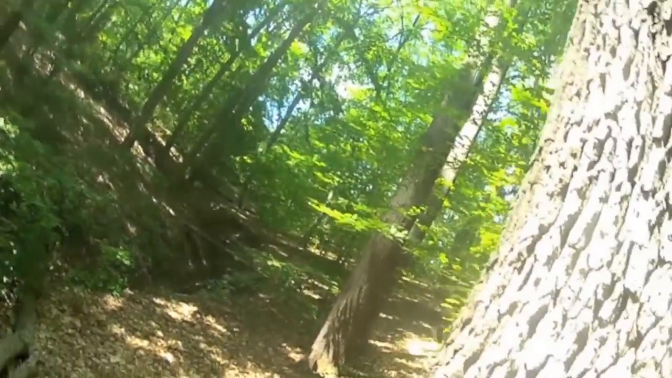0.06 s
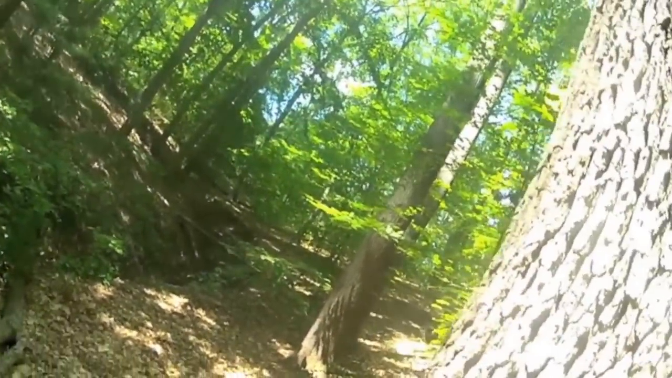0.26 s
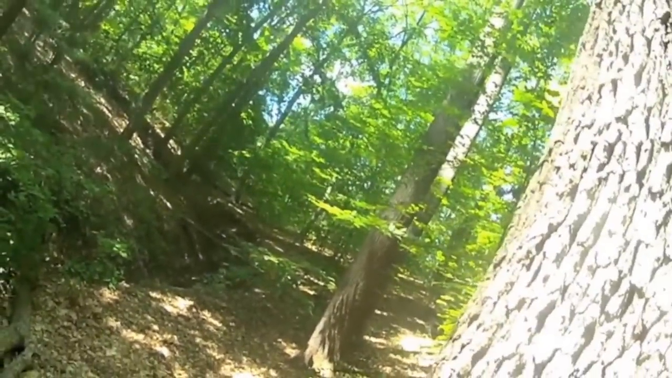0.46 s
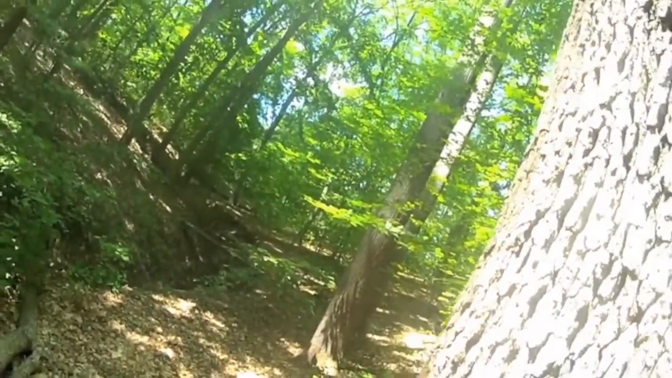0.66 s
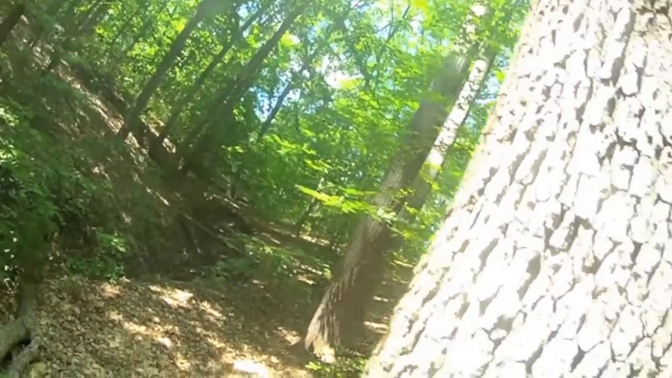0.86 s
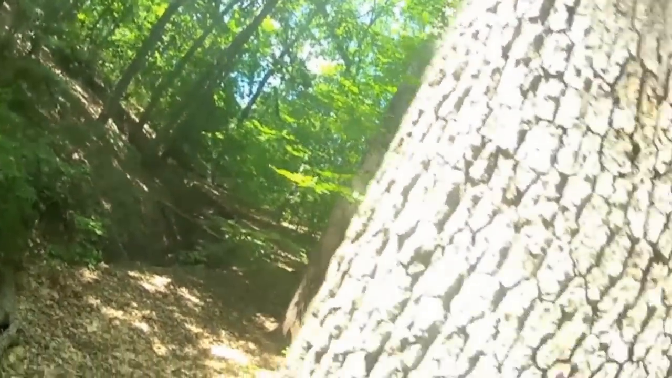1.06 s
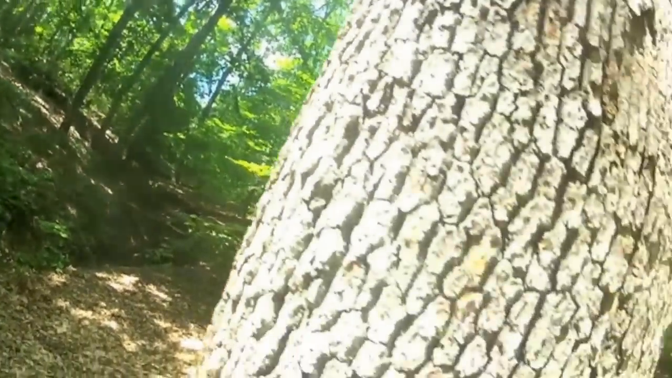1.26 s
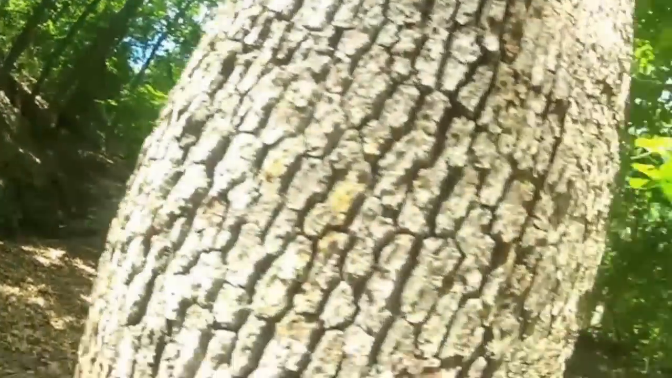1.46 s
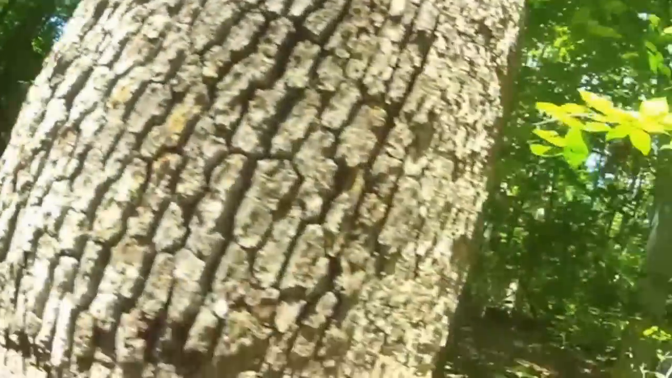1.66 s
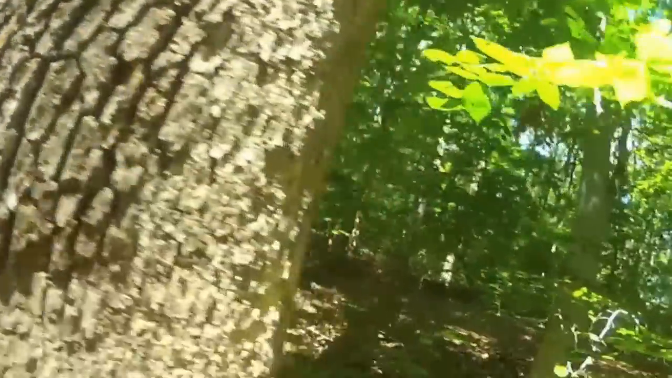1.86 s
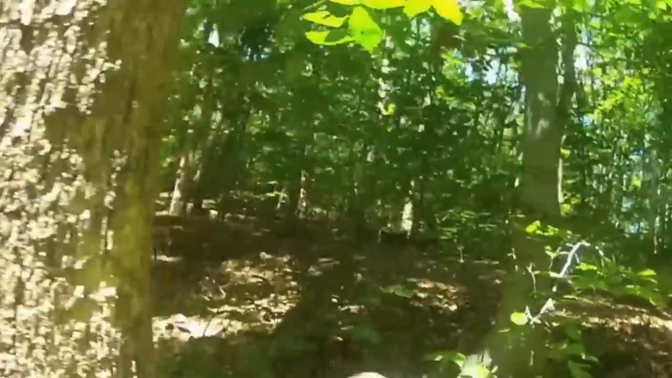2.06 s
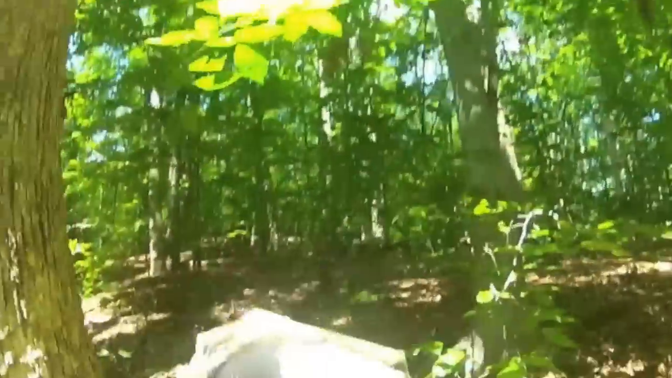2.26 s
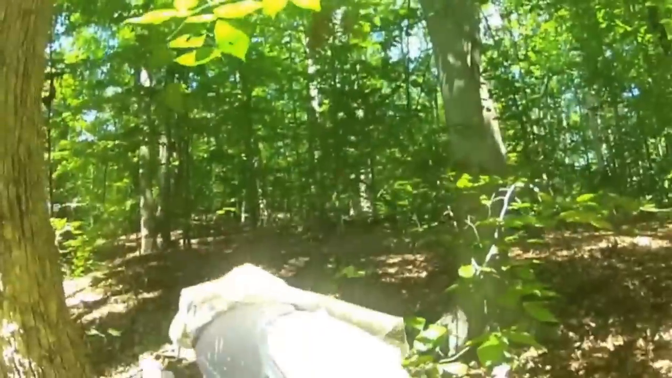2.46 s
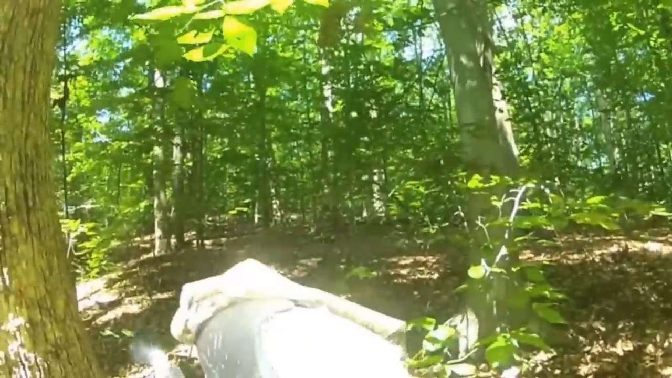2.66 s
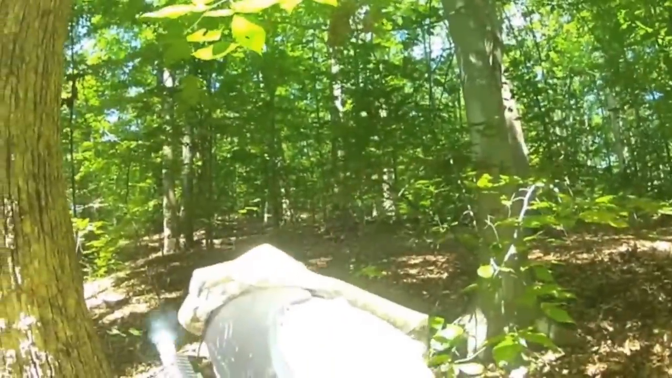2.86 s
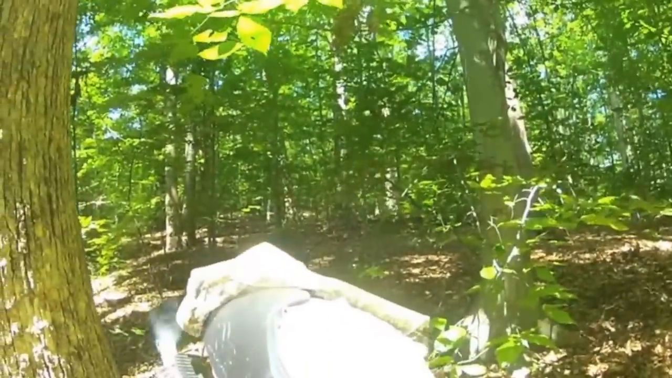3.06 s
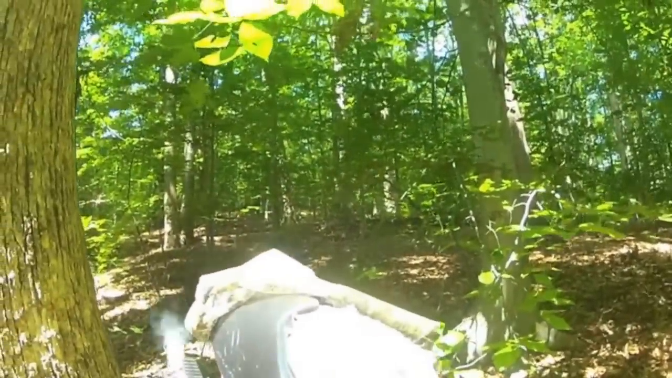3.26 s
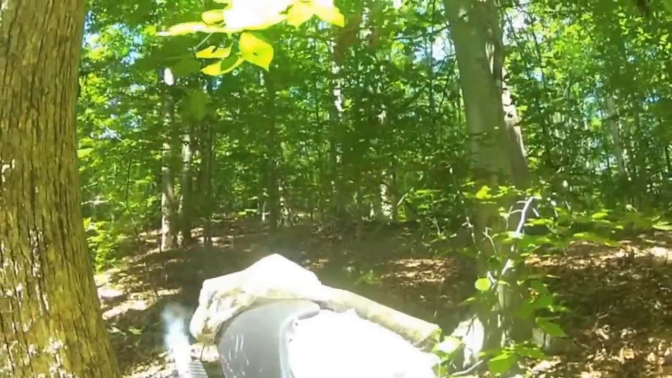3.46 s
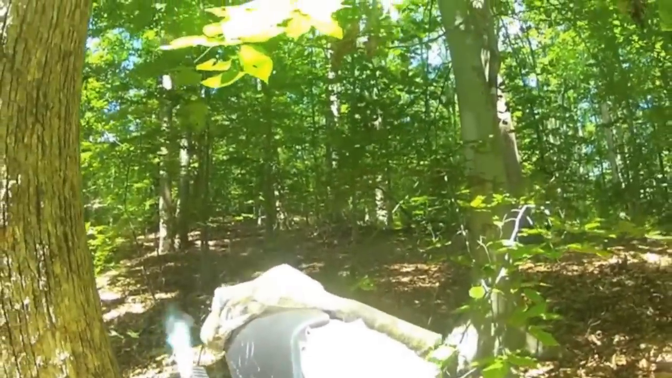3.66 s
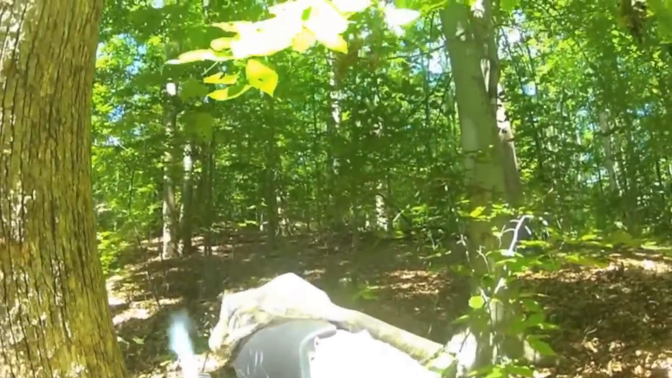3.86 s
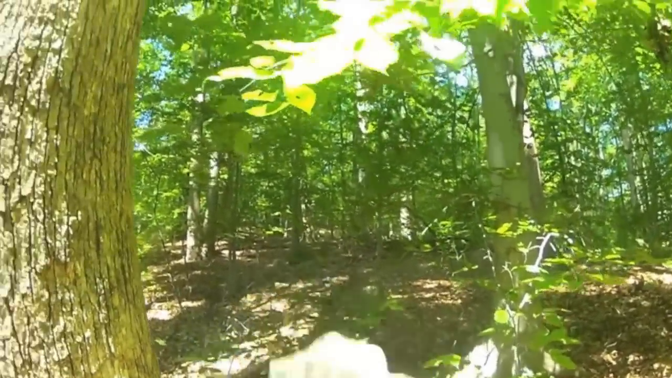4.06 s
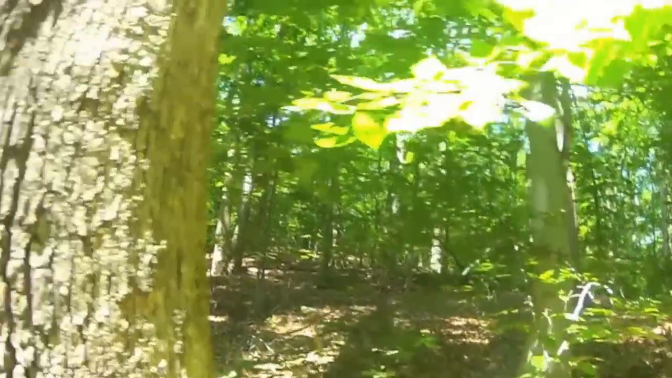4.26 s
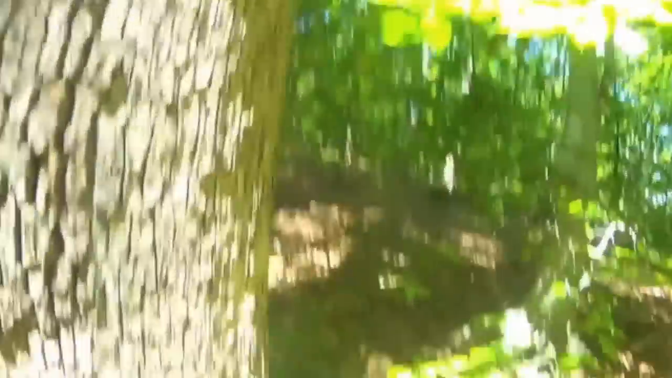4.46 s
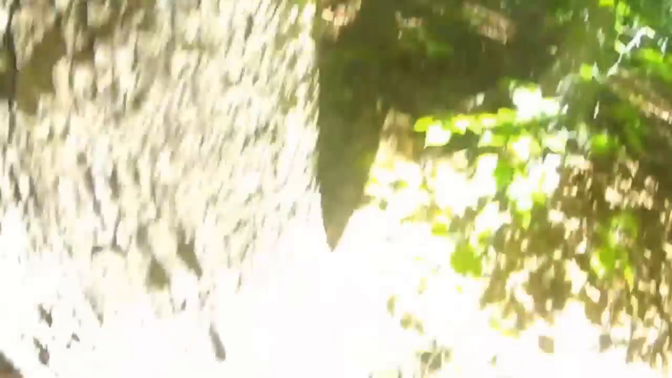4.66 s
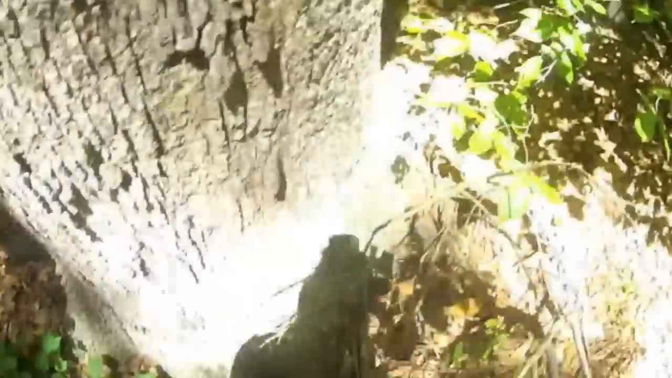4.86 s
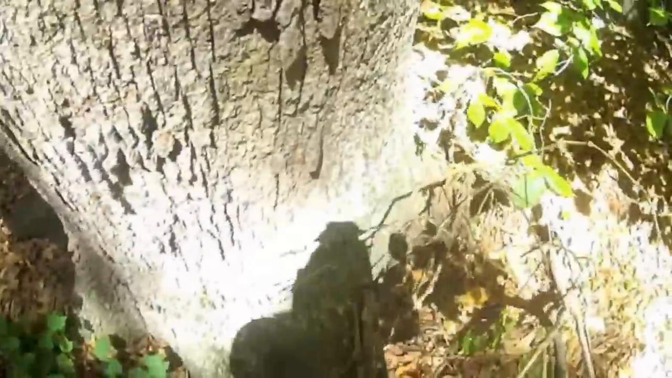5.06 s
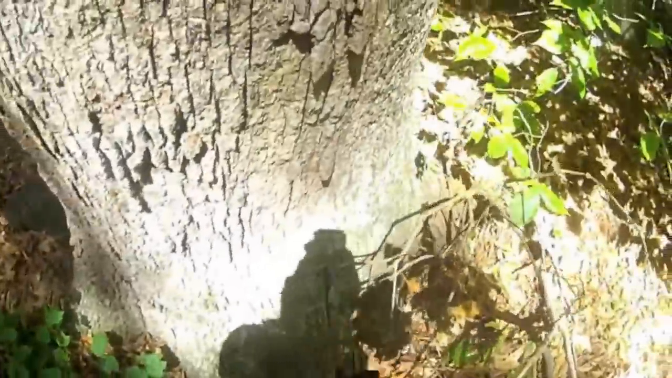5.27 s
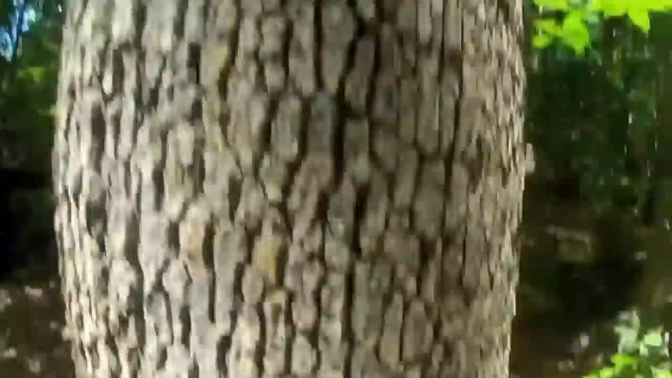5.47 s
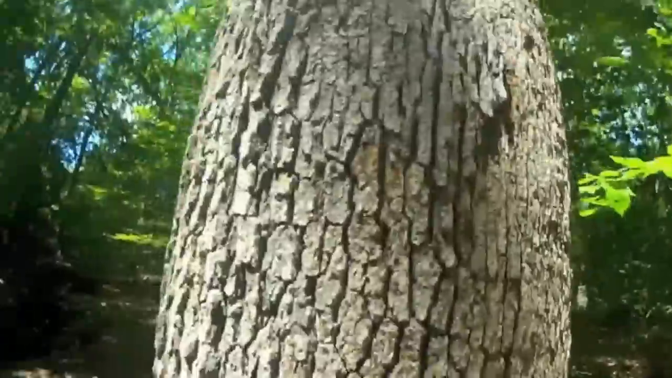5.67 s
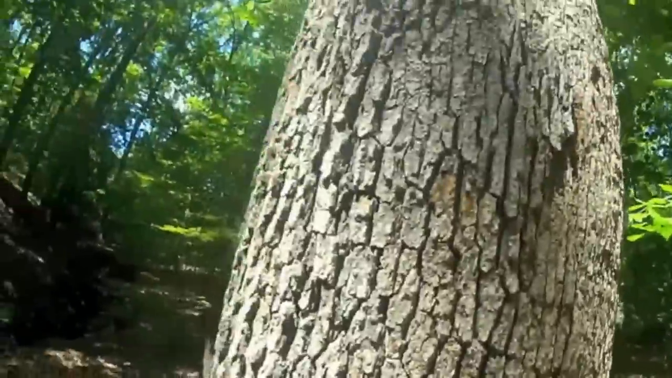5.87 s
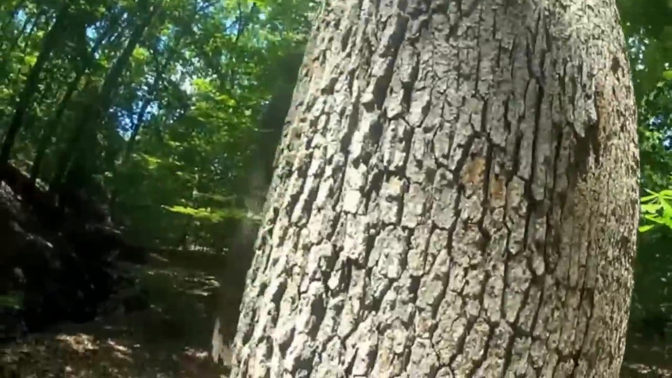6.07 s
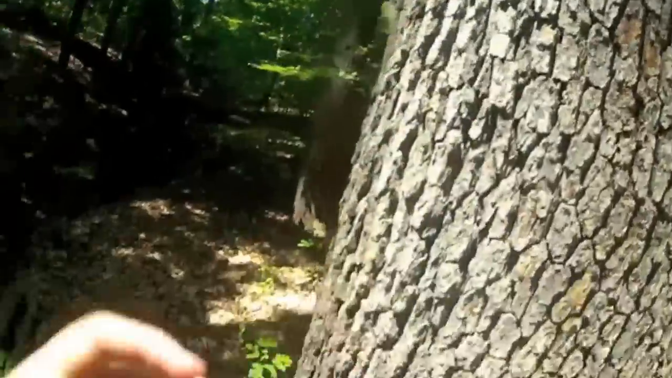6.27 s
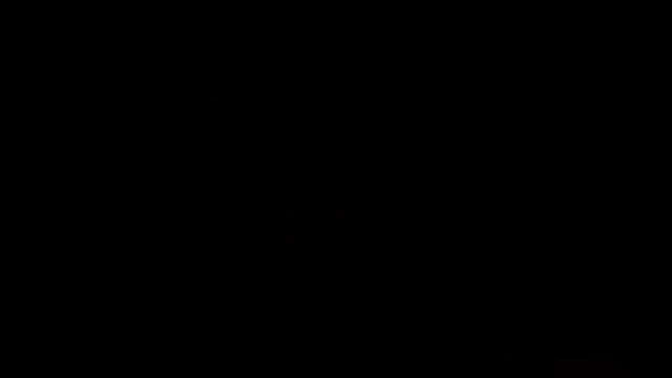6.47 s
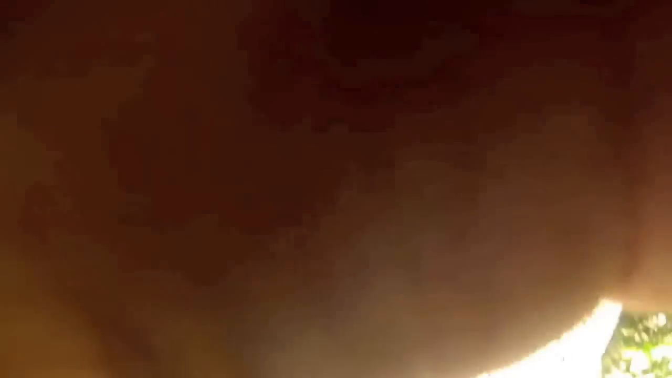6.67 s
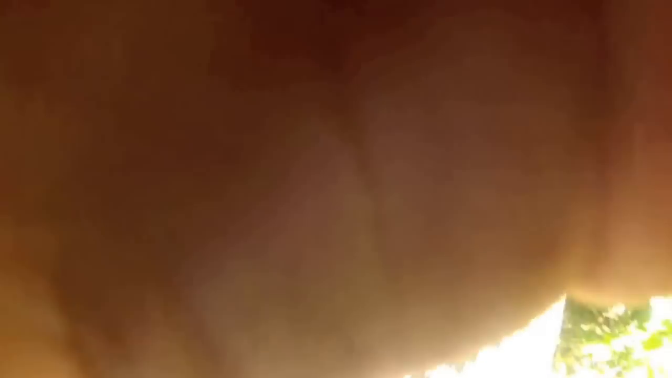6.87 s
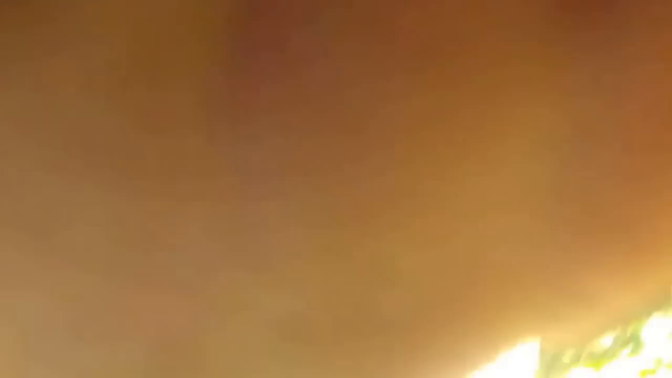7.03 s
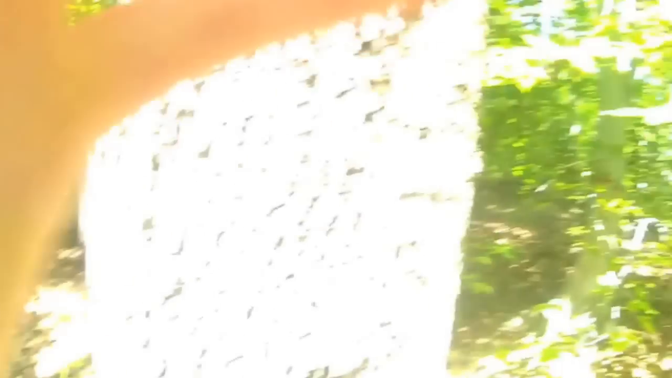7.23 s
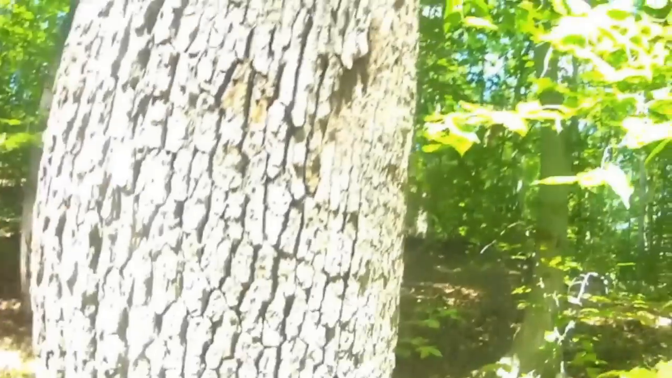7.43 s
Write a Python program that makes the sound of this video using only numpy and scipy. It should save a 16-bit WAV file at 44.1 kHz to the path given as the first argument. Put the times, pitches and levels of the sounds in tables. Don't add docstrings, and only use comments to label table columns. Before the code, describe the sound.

Faint, boxy woodland hush with scattered dull pops in the distance and light cloth movement. Seven hard, hollow air-gun cracks follow very close by, about four a second, with slight scatter from the trees. A quick metallic clatter and bumps of fabric come next, then quieter rubbing. The end is abrupt and much rougher: deep pressure thumps, plastic snaps and skin scraping overload the enclosed microphone.

```python
import sys
import numpy as np
from scipy import signal
from scipy.io import wavfile
from scipy.ndimage import uniform_filter1d

SR = 44100
rng = np.random.default_rng(int(sys.argv[2]) if len(sys.argv) > 2 else 0)


def put_to_file(sound):
    columns = np.atleast_2d(sound).T
    safe = np.clip(columns, -1, 1)
    whole_steps = np.round(safe * 32767)
    wavfile.write(sys.argv[1], SR, whole_steps.astype(np.int16))


def undo_db(level):
    steps = np.asarray(level, float) / 20
    return 10 ** steps


N = 330750

# [f/Hz, level/dB]
WOODS_TONE = [(47, -28.5), (80, 2), (265, 2.5), (751, -13.5), (1220, -15.5), (1490, -26.5), (2040, -17),
              (2840, -18.5), (3540, -19), (5170, -22.5), (6030, -30.5), (8410, -22), (12300, -37),
              (14300, -27), (16000, -49.5)]
# [t/s, level/dB]
HISS_LEVEL = [(0, -60.5), (1, -60), (2, -59.5), (4.2, -59), (5, -60.5), (5.3, -61), (6, -61), (6.45, -59),
              (6.9, -77), (7.3, -55), (7.5, -57)]
# [f/Hz, level/dB]
TREE_TONE = [(88, -35), (150, -3), (424, -10.5), (1240, -1), (1430, -8.5), (1990, -0.5), (2780, -13.5),
             (3510, -1), (5300, -12.5), (5960, -20), (8320, -9), (12100, -32.5), (14400, -12),
             (15300, -21.5), (16200, -47.5)]

# [f/Hz, level/dB]
HOUSING = [(180, -28), (300, -12.5), (463, -8.5), (616, -7), (800, -12.5), (995, -1.5), (1340, -15),
           (1760, -2.5), (2290, -6), (2600, -9), (2900, -19), (3500, -13), (3830, -11), (4100, -35.5)]
# [f/Hz, level/dB]
CAVITY = [(4470, -30.5), (5210, -25.5), (6000, -37.5), (6910, -25.5), (7730, -39), (8100, -28), (8400, -14),
          (9010, -29), (9840, -15.5), (10900, -27.5), (12000, -28.5), (13100, -27.5), (14200, -18.5),
          (15300, -42.5)]
# [f/Hz, level/dB]
HELD = [(300, -0.1), (700, 1), (1500, 0), (2500, 1), (4000, -0.4), (6000, -2), (9000, 0.7), (13000, -1)]
# [f/Hz, width/Hz, share removed/1]
PORT = [(2790, 400, 0.34), (6000, 420, 0.6), (8900, 660, 0.44), (12140, 900, 0.79)]
BAND_LIMITS = 15450, 16300

# [t/s, level/dB]
RUMBLE_LEVEL = [(0.0, -56), (.25, -50), (.45, -59.5), (0.81, -60), (1.1, -53), (1.5, -57.5), (2.4, -43),
                (2.8, -56.5), (3.43, -49.5), (3.6, -61.5), (4.3, -48.5), (4.6, -48.5), (4.95, -44),
                (5.25, -57.5), (5.55, -45), (5.89, -54.5), (6.15, -51), (6.58, -45.5)]
# [t/s, level/dB]
SQUEEZE_LEVEL = [(6.58, -60), (6.68, -20.5), (6.79, -33), (6.92, -43), (7.04, -31), (7.12, -33),
                 (7.27, -32), (7.31, -44.5), (7.5, -47)]
# [peak t/s, level/dB, 20 dB fade/s (negative: a slow swell of that length, then a quicker fall), deep
# share/dB]
CLOTH = [(.66, -70, 0, 0.5), (1.185, -59.5, 0.08, -2), (1.63, -54, 0.09, -13), (1.85, -68, .5, -4),
         (2.07, -60, 0.2, -1), (2.23, -58, -0.05, 6.5), (2.285, -40, 0.1031, -4.5), (2.42, -47, 0.1, 4),
         (2.8, -64.5, 2.5, -5), (4.41, -44.5, 0.0566, 3.5), (4.47, -48.5, 0.1, -8.5),
         (4.55, -39, 0.05, -0.5), (4.595, -48.5, 0.0834, 14), (4.72, -57.5, -0.03, 4),
         (4.772, -42, 0.01, -5), (4.85, -51, 0.04, 0.5), (4.875, -55, 0.02, -4.5), (4.925, -51, 0.06, 2),
         (4.965, -57.5, 0.0167, 6.5), (5.02, -59.5, 0.1, 9), (5.15, -68, 0.06, -3), (5.435, -43, 0.04, 2),
         (5.475, -43, 0.0457, 3), (5.58, -42, 0.14, -0.5), (5.67, -53.5, 0.1357, 0.5),
         (5.81, -53.5, 0.11, 3.5), (5.99, -55.5, 0.1157, -3), (6.09, -58.5, 0.03, -0.5),
         (6.27, -65, 0.4, -0.5), (6.37, -52, 0.01, -2.5), (6.5, -61.5, 0.18, 4)]
# [peak t/s, level/dB, 20 dB fade/s (negative: a slow swell of that length,
# then a quicker fall), deep share/dB]
SKIN = [(6.58, -35.5, 0.17, 13), (6.685, -23, 0.11, -5), (6.735, -25.5, 0.08, -6),
        (6.784, -25.5, 0.0466, 5.5), (6.825, -41.5, -0.02, 8), (6.865, -33.5, 0.01, 12),
        (6.957, -32.5, 0.02, -1), (7, -34, 0.07, 14), (7.11, -28, 0.06, 5), (7.135, -28, .05, 3),
        (7.16, -25.5, 0.1133, -4.5), (7.2, -30.5, 0.07, -5), (7.24, -32, 0.08, -7), (7.36, -49, 0.06, -16),
        (7.49, -45.5, 0.24, -11.5)]
CLOTH_RISE, SKIN_RISE = 0.55, 0.57
GRIP_S = 6.571
REST_DB, REST_DEEP_DB = -9, 1

# [t/s, peak level/dB, t60/s, brightness/dB]
FAR = [(0.133, -31, 0.03, -14), (0.335, -48.5, 0.02, -11.5), (0.423, -34, 0.044, -12),
       (0.717, -47.5, 0.015, 0), (0.843, -46.5, 0.032, -13), (0.929, -34.5, 0.0435, -10),
       (1.155, -41.5, 0.0089, -8), (1.213, -46, 0.0115, 4), (1.278, -32.5, 0.0188, -24),
       (1.492, -48, 0.02, -10), (1.572, -38.5, 0.031, -25), (1.912, -58, 0.023, -12),
       (2.083, -41.5, 0.027, -12), (2.114, -38.5, 0.047, -10.5), (2.502, -43, 0.024, -7)]
# [f/Hz, level/dB]
FAR_TONE = [(180, -37), (300, -10.5), (918, -3.5), (1460, -11.5), (2220, 2), (3050, -9.5), (5210, -17),
            (6050, -30), (6800, -19.5), (9030, -18.5), (9820, -12), (12000, -41), (14400, -15.5),
            (15400, -36), (16200, -64)]
SLOPE_DB, SLOPE_RISE_S, SLOPE_T60_S = -22, 0.036, 0.7

# [length/s, level/dB, start f/Hz, end f/Hz]
RASP = (0.03, -52, 1751, 2050)
RASP_S = 1.592
# [t/s, peak level/dB, rattle/s, t60/s, ring f/Hz]
GEAR = [(1.505, -36, .001, .012, 3000), (4.381, -31.5, 0.002, 0.037, 2300),
        (4.395, -30.5, 0.0037, 0.084, 3700), (4.446, -44, .002, .03, 1850), (4.4716, -41, .002, .03, 2450),
        (4.4905, -37.5, .003, .03, 3700), (4.532, -19.5, 0.004, 0.033, 3250),
        (4.538, -19.5, 0.0025, 0.034, 2500), (4.553, -32, 0.0026, 0.0175, 1900),
        (4.5748, -34.5, 0.0018, .02, 694), (4.601, -20.5, 0.0036, 0.026, 2720),
        (4.611, -25, 0.0055, 0.022, 3400), (4.618, -13.5, 0.0014, 0.015, 3530),
        (4.87, -51, 0.0022, 0.019, 2500)]
# [t/s, peak level/dB, f/Hz, t60/s, way/1 (1 in, -1 out)]
PUSHES = [(3.135, -28, 50, .15, 1), (3.371, -24.5, 56.1, .12, 1), (5.486, -31.5, 35, 0.086, -1),
          (6.5714, 0.5, 62, .03, 1), (6.576, 5, 58, .022, -1), (6.588, -5, 36, .05, 1),
          (6.599, -9, 60, .03, -1), (6.606, 0, 87.8, 0.055, 1), (6.635, -9, 48, .03, 1),
          (6.642, -4, 105, 0.04, -1), (6.701, -13, 60, .03, 1), (6.708, -9.5, 109, 0.044, -1),
          (6.7865, -3, 150, .02, -1), (6.835, -17, 70, 0.056, -1), (6.8655, -13, 171, .05, 1),
          (6.8763, -2, 200, 0.015, 1), (6.967, -6.5, 232, 0.013, -1), (6.9766, 0, 169, 0.017, -1),
          (6.9937, -8.5, 148, 0.018, -1), (7.005, -21.5, 260, 0.069, 1), (7.02, -17, 221, 0.024, 1),
          (7.095, -17, 200, .03, 1), (7.141, -9.5, 168, 0.035, 1), (7.152, -5.5, 207, 0.032, -1),
          (7.234, -15, 100, 0.015, 1), (7.238, -9.5, 75, .025, -1)]
# [t/s, peak level/dB, ring f/Hz, length/s, grit/dB]
CREAKS = [(6.5722, -13, 590, 0.0038, 1), (6.584, -19, 496, 0.0016, 2), (6.599, -16, 2290, 0.003, -1),
          (6.638, -20, 1890, 0.0022, -1), (6.669, -20, 1100, .002, 0.1), (6.677, -5, 970, 0.0021, -7),
          (6.697, -16, 2300, .002, -1), (6.711, -17, 2000, .002, -3), (6.729, -11, 1130, 0.0017, -4.5),
          (6.74, -15.5, 1800, .002, -5), (6.7843, -5.5, 932, 0.00155, -7), (6.7905, 7, 904, 0.0029, -2.5),
          (6.822, 1.5, 970, 0.0011, -3.5), (6.873, 5, 953, 0.0033, -9), (6.876, 0, 1533, 0.0022, -10),
          (6.968, -13, 900, 0.001, -9), (6.978, -0.5, 527, 0.0027, -9), (6.989, -3.5, 2400, 0.0016, -11),
          (7.058, -20, 1855, 0.00098, -12), (7.107, -18, 1900, .003, -2), (7.114, -6, 500, 0.0008, 6),
          (7.143, -8, 400, 0.003, -6), (7.15, -3, 420, 0.0033, 0.1), (7.151, -3, 1690, .002, -6),
          (7.033, -25, 1490, .001, -1), (7.08, -30, 1700, 0.0019, -4), (7.165, -21, 5200, 0.001, 2),
          (7.1925, -22, 1840, .001, -10), (7.227, -15, 1050, .0006, 1.5), (7.233, -19, 1100, .002, -8)]

# [blast t/s, peak level/dB, sear level/dB, bolt level/dB, trigger lag/s]
SHOTS = [
    (2.665, -5.5, -20, -13, 0.094),
    (2.908, -6, -20.5, -10.5, 0.08),
    (3.112, -5, -19.5, -12, 0.081),
    (3.351, -5.5, -18, -8.5, 0.069),
    (3.558, -6, -17.5, -9.5, .08),
    (3.77, -5, -19.5, -9.5, 0.076),
    (3.99, -5.5, -19.5, -11, 0.071),
]
# [f/Hz, width/Hz, level/dB]
BARREL = [(330, 99, -2), (651, 75, -7), (1030, 200, -2), (1820, 850, 0.5), (2093, 530, 7), (2653, 220, -8),
          (3350, 160, -11), (5040, 420, -4), (6680, 280, -5), (8330, 580, -11.5), (9810, 330, -7.5),
          (14000, 380, -15)]
# [f/Hz, width/Hz, level/dB]
TUBE = [(3433, 130, -1.5), (5220, 120, -1), (6870, 130, -2), (8650, 190, -8)]
# [f/Hz, level/dB]
SEAR_TONE = [(500, -34), (1050, -9), (1600, -22), (2500, -1), (3100, -7), (3750, -1), (4500, -6),
             (5950, -24), (7700, -9), (9500, -14), (11800, -36), (14600, -17), (16200, -38)]
# [f/Hz, level/dB]
BOLT_TONE = [(400, -26.5), (1200, -3), (1750, -13), (2500, 1), (3300, -7), (5100, -11.5), (5950, -24),
             (6900, -12), (8250, -14), (9600, -13), (11800, -36), (14500, -16), (16200, -38)]
# [f/Hz, level/dB]
METAL_TONE = [(180, -39), (300, -36), (566, -15), (1160, -9), (1730, -12), (2500, 2), (3260, -2),
              (4560, -11), (5380, -25), (5950, -28), (7390, -11.5), (9660, -8.5), (11800, -42),
              (14700, -15), (16200, -33)]
SEAR_LEAD, VALVE_LEAD, BOLT_LAG = 0.0222, 0.004, 0.0152
TRIGGER_DB = -35


def evened(x):
    return x / np.sqrt(np.mean(x ** 2) + 1e-20)


def peaked(x):
    return x / (abs(x).max() + 1e-12)


def add(mix, s, sound):
    part = mix[round(s * SR):][:len(sound)]
    part += sound[:len(part)]


def curve(rows):
    s, value = np.transpose(np.asarray(rows, float))
    return np.interp(np.arange(N) / SR, s, value)


def colour(x, points):
    f, db = np.transpose(points)
    hz = abs(np.fft.fftfreq(4096, 1 / SR))
    gain_db = np.interp(np.log(hz + 1), np.log(f + 1), db)
    log_gain = np.log(undo_db(np.maximum(gain_db, -100)))
    taps = np.fft.ifft(np.exp(np.conj(signal.hilbert(log_gain)))).real[:2048]
    return signal.oaconvolve(x, taps)[:len(x)]


def ring(x, modes):
    out = np.zeros(len(x))
    for k, (hz, width, db) in enumerate(modes):
        b, a = signal.iirpeak(min(hz, SR / 2 - 500), hz / max(width, 10), SR)
        out += (-1) ** k * undo_db(db) * signal.lfilter(b, a, x)
    return out


def burst(rise, t60, length=0.25, hold=0):
    t = np.arange(round(length * SR)) / SR
    fall = undo_db(-60 * np.maximum(t - rise - hold, 0) / t60)
    return rng.standard_normal(len(t)) * np.minimum(t / rise, 1) * fall


def drift(n, first, second):
    return evened(uniform_filter1d(uniform_filter1d(rng.standard_normal(n), first), second))


def woods():
    wash = evened(colour(rng.standard_normal(N), WOODS_TONE))
    low = signal.sosfiltfilt(signal.butter(2, 600, fs=SR, output="sos"), wash)
    leaves = undo_db(1.5 * drift(N, 2000, 800)) * (wash - low)
    return undo_db(curve(HISS_LEVEL)) * (low + leaves)


def rumble():
    sos = signal.butter(2, [12, 40], "band", fs=SR, output="sos")
    before_grip = np.arange(N) < GRIP_S * SR
    level = np.where(before_grip, undo_db(curve(RUMBLE_LEVEL)), undo_db(curve(SQUEEZE_LEVEL)))
    return undo_db(0.5) * level * evened(signal.sosfilt(sos, rng.standard_normal(N)))


def strokes(rows, rise):
    s, db, fade, deep_db = np.transpose(rows)[:, :, None]
    t = np.arange(0, N + 32, 32) / SR
    level = undo_db(db - 20 * np.maximum((t - s) / fade, (s - t) / (fade * rise)))
    totals = [np.sqrt((g ** 2).sum(0)) for g in (level, level * undo_db(deep_db))]
    return [np.interp(np.arange(N) / SR, t, total) for total in totals]


def rubbing():
    grain_db = 3.7 * np.minimum(rng.exponential(1, N), 4)
    grain_hits = rng.random(N) < 2500 / SR
    grains = undo_db(grain_db) * grain_hits * rng.standard_normal(N)
    slips = drift(N, 400, 200)
    drive = (evened(grains) * 0.85 + rng.standard_normal(N)) * undo_db(2.6 * slips)

    strap = evened(ring(drive, [(238, 20, 8.0), (127, 57, -7.5), (510, 260, -17)]))
    skin = evened(ring(drive, [(137, 122.6, -0.64), (273.0, 143.5, -1.4)]))
    shell = evened(colour(drive, HOUSING + CAVITY))
    gripped = np.arange(N) >= GRIP_S * SR
    shell_now = np.where(gripped, colour(shell, HELD), shell)
    deep_now = np.where(gripped, skin, strap)

    level, deep = np.where(gripped, strokes(SKIN, SKIN_RISE), strokes(CLOTH, CLOTH_RISE))
    rest = undo_db(curve(HISS_LEVEL) + REST_DB)
    level = np.hypot(level, rest)
    deep = np.hypot(deep, rest * undo_db(REST_DEEP_DB))
    return undo_db(1.52) * (level * shell_now + deep * undo_db(-2.0) * deep_now)


def slope_echo():
    swell = burst(SLOPE_RISE_S, SLOPE_T60_S, 0.3)
    return evened(colour(swell, HOUSING + CAVITY)) * undo_db(SLOPE_DB)


def scatter(t60):
    hiss = burst(0.017, t60, 0.45)
    hiss = hiss * (1 + 6.1 * (rng.random(len(hiss)) < 250 / SR))
    trunks = drift(len(hiss), 250, 150)
    return peaked(colour(hiss, TREE_TONE)) * undo_db(2.7 * trunks)


def far_shot(t60, bright_db):
    pop = burst(0.0029, t60, 0.45)
    pop[round(0.0012 * SR)] += 6.5
    edge = colour(burst(0.000166, 0.0084, 0.45), METAL_TONE)
    edge = peaked(np.diff(edge, prepend=0))
    return peaked(colour(pop, FAR_TONE)) + undo_db(bright_db) * edge + undo_db(-11.5) * scatter(0.4)


def strap_rasp(length, db, from_hz, to_hz):
    u = np.linspace(0, 1, round(length * SR))
    fuzz = uniform_filter1d(rng.standard_normal((2, len(u))), 45, axis=1)
    phase = 2 * np.pi * np.cumsum(from_hz + (to_hz - from_hz) * u) / SR
    band = evened(fuzz[0] * np.cos(phase) + fuzz[1] * np.sin(phase))
    return undo_db(db) * np.sin(np.pi * u) * band


def clack(rattle, t60, hz):
    hit = burst(0.0011, t60, hold=rattle)
    struck_part = peaked(ring(hit, [(hz, hz * 0.15, 0)]))
    return peaked(peaked(colour(hit, METAL_TONE)) + 0.66 * struck_part)


def push(hz, t60):
    t = np.arange(round(0.2 * SR)) / SR
    swing = np.sin(2 * np.pi * hz * t)
    return -peaked(swing * np.minimum(t * hz * 3.5, 1) * undo_db(-60 * t / t60))


def creak(hz, length, grit_db):
    t = np.arange(round(0.03 * SR)) / SR
    shape = np.minimum(t / 0.0004, 1) * undo_db(-60 * np.maximum(t - length, 0) / 0.009)
    wobble = 1 + 0.3 * evened(uniform_filter1d(rng.standard_normal(len(t)), 40))
    phase = 2 * np.pi * np.cumsum(hz * wobble) / SR
    tone = np.sin(phase) + 0.35 * (hz < 1300) * np.sin(2.3 * phase)
    body = evened(colour(colour(rng.standard_normal(len(t)), HOUSING + CAVITY), HELD))
    snap = evened(np.diff(body, prepend=0))
    return shape * (undo_db(grit_db) * (body + 0.17 * snap) - tone)


def shot(sear_db, bolt_db, trigger_lag):
    gas, sear, metal, far = np.zeros((4, SR // 2))
    t = np.arange(len(gas)) / SR - SEAR_LEAD

    add(sear, 0, burst(0.0005, 0.016, 0.03, hold=0.003))
    add(sear, 0.004, undo_db(-16.5) * burst(0.002, 0.082, 0.04))

    add(gas, SEAR_LEAD - VALVE_LEAD, undo_db(-20.5) * burst(0.0012, 0.013))
    add(gas, SEAR_LEAD - 0.001, undo_db(-9.5) * burst(0.0026, 0.016))
    add(gas, SEAR_LEAD, undo_db(-22.5) * burst(0.0026, 0.061, hold=0.0055))
    swell = np.exp(-((t - 0.0015) / 0.0012) ** 2)
    period = round(SR / 1735)
    uneven = 1 + 0.15 * rng.standard_normal(len(gas[::period]))
    gas[::period] += 2.2 * swell[::period] * uneven
    add(gas, SEAR_LEAD + 0.0035, undo_db(-18.0) * burst(0.0005, 0.011, hold=0.0011))

    add(metal, SEAR_LEAD + BOLT_LAG, burst(0.0005, 0.02, hold=0.003))
    add(metal, SEAR_LEAD + trigger_lag, undo_db(TRIGGER_DB - bolt_db) * burst(0.0016, 0.056))
    add(far, SEAR_LEAD + 0.0057, scatter(0.5))

    kick = np.exp(-((t - 0.0012) / 0.0013) ** 2) - 0.58 * np.exp(-((t - 0.004) / 0.00083) ** 2)
    jolt = np.exp(-((t - 0.0012) / 0.00014) ** 2)
    blast = peaked(ring(gas, BARREL[2:]))
    blast = blast + undo_db(-15.5) * peaked(ring(gas, TUBE))
    blast = blast + undo_db(-23.5) * kick
    blast = blast + undo_db(-14.0) * peaked(ring(jolt, BARREL[:2]))
    click = undo_db(sear_db) * peaked(colour(sear, SEAR_TONE))
    bolt = undo_db(bolt_db) * peaked(colour(metal, BOLT_TONE))
    return blast + click + bolt + undo_db(-32.5) * far


def scene():
    mix = woods() + rumble() + rubbing()
    for s, db, *rest in FAR:
        add(mix, s, undo_db(db + 1.5) * far_shot(*rest))
        add(mix, s, undo_db(db - 10) * slope_echo())
    add(mix, RASP_S, strap_rasp(*RASP))
    for s, db, *rest in GEAR:
        add(mix, s, undo_db(db) * clack(*rest))
    for s, db, hz, t60, way in PUSHES:
        add(mix, s, undo_db(db) * np.sign(way) * push(hz, t60))
    for s, db, *rest in CREAKS:
        add(mix, s, undo_db(db - 7.5) * creak(*rest))
    for s, db, *rest in SHOTS:
        add(mix, s - SEAR_LEAD, undo_db(db + 3.0) * shot(*rest))
    return mix[None]


def roll_off(x):
    return signal.sosfilt(signal.butter(12, 16460, fs=SR, output="sos"), x)


def record(dry):
    x = dry
    for hz, width, share in PORT:
        x = x - np.clip(share, 0, 1) * ring(x[0], [(hz, width, 0)])
    for edge_hz in BAND_LIMITS:
        low_pass = signal.firwin(511, edge_hz, window=("kaiser", 9), fs=SR)
        x = signal.oaconvolve(x, low_pass[None], "same")
        x = np.clip(x, -1, 1)
    return roll_off(x)


dry = scene()
out = record(dry)
put_to_file(out)
```